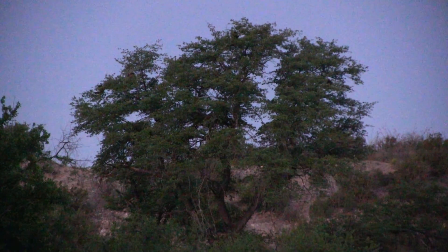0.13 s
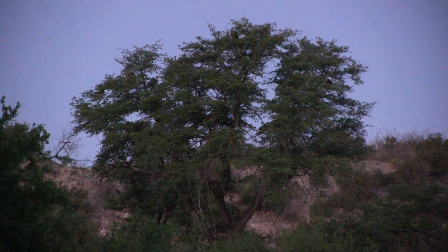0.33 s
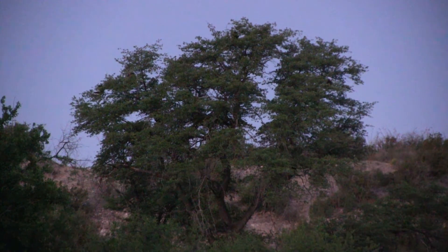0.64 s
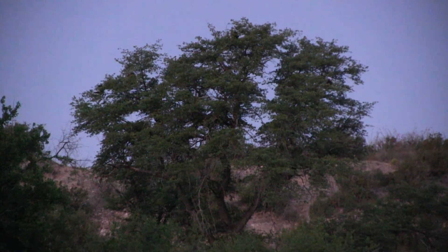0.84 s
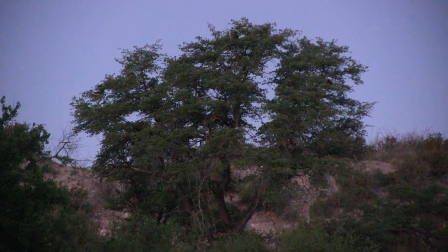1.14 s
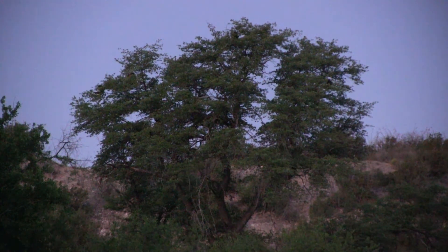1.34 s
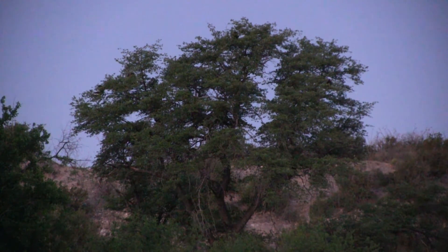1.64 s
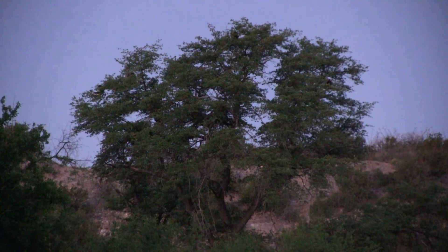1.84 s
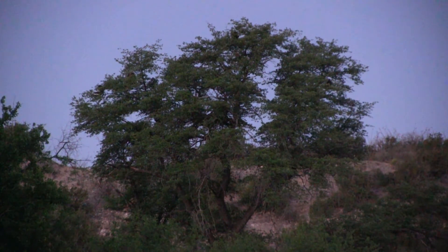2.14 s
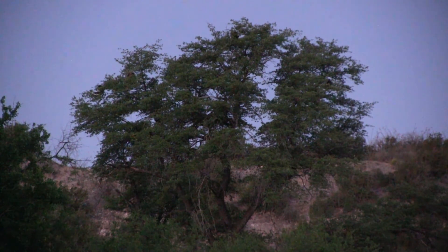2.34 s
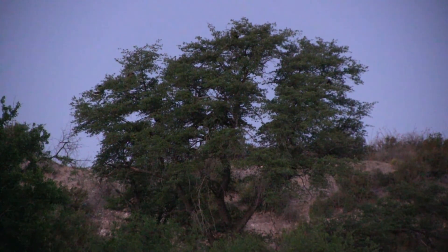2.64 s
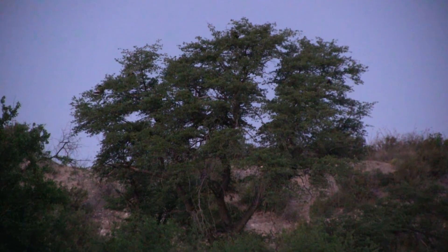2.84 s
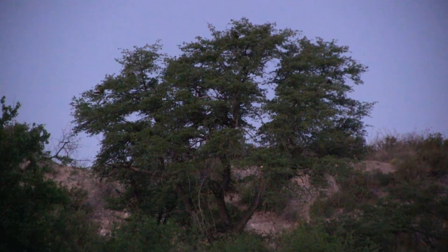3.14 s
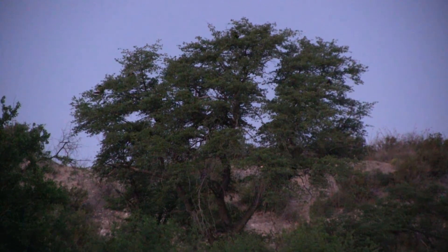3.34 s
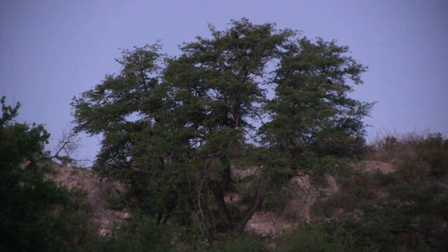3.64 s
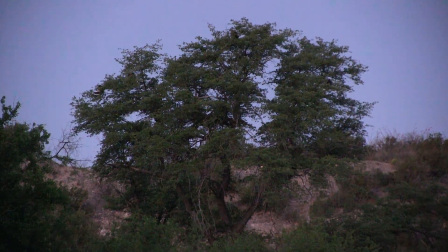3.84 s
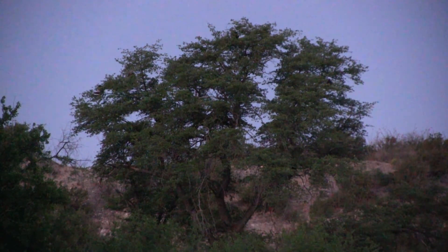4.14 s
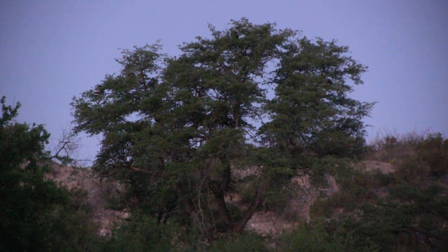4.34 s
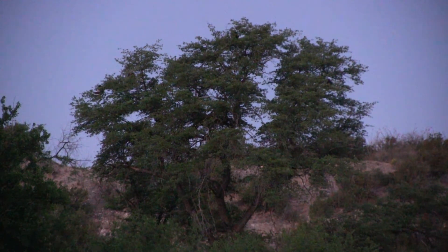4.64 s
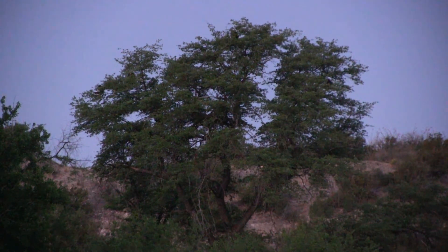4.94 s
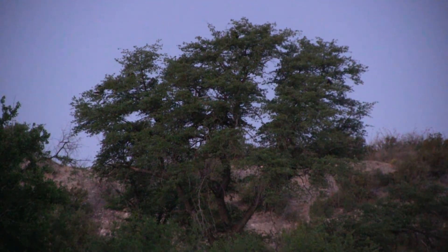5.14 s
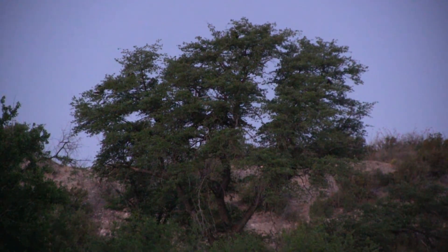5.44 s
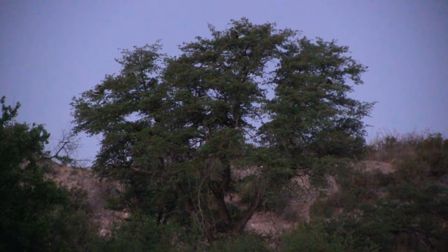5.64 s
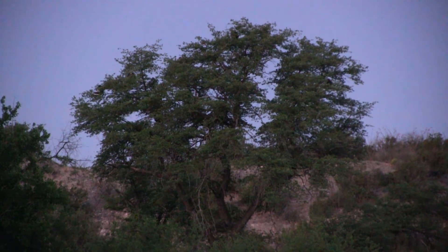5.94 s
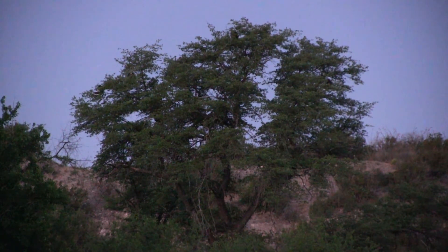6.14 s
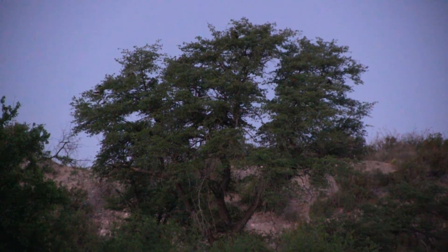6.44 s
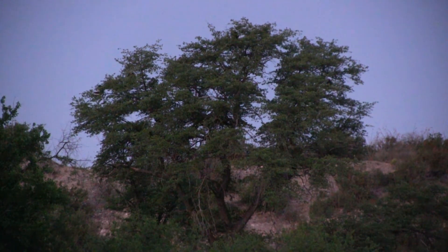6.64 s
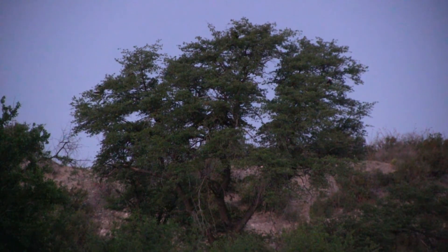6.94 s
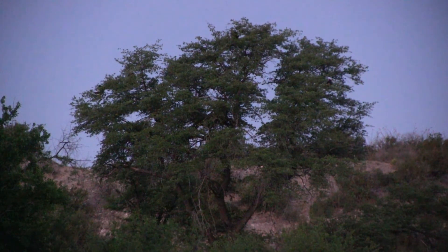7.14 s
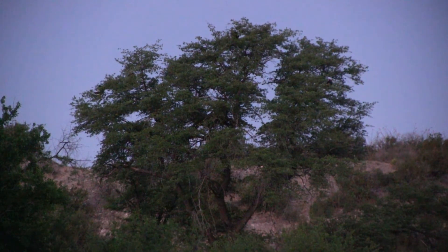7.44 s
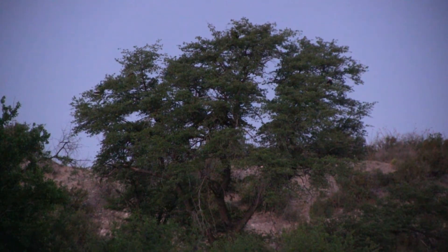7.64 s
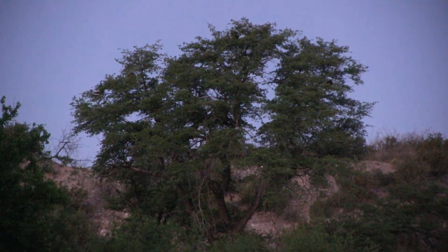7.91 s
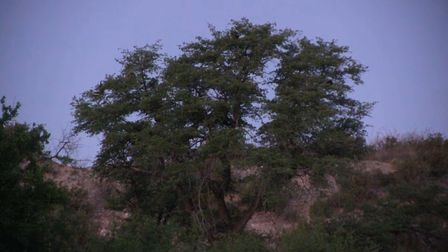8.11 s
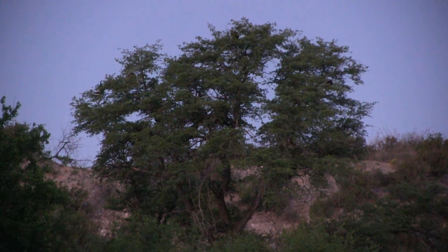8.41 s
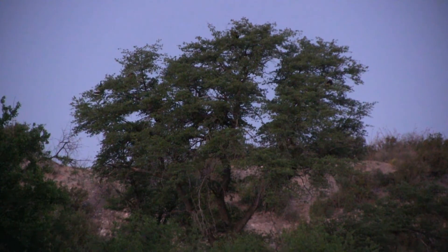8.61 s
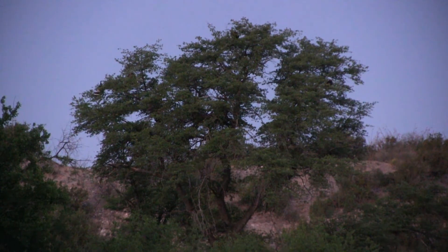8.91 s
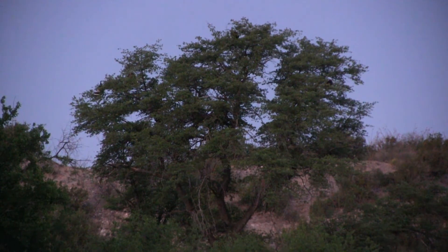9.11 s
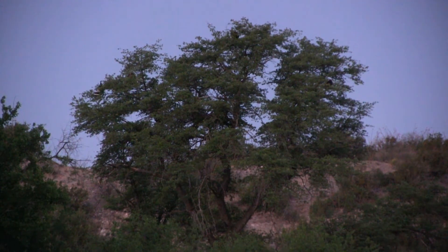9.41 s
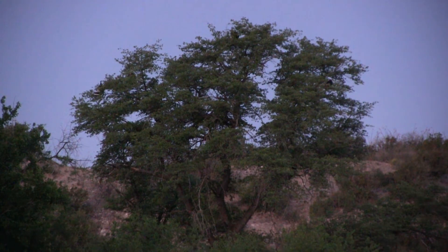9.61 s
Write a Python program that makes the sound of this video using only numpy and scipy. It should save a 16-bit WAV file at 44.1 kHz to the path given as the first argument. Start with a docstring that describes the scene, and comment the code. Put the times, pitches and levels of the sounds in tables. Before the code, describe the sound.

Still dawn air with faint rumble and microphone hiss, birds straight ahead across a brushy gully. From 0.2 s a turkey gives soft, nasal, wavering yelps, about 0.1 s each and three per second, fading by 2.8 s. Distant songbirds trill, chip in quickening runs and whistle thinly throughout. At 3.1 s a rough, low gobble tumbles in rapid raspy notes and gulps until about 4.3 s. From 4 to 6.4 s sharp, bright, dropping cutts pulse evenly near 0.3 s apart; a faint fluttering buzz rises at 4.05-4.5 s. A second, more broken gobble runs 6.6-7.8 s, with two more cutts and a small dry tick at 7.5 s. From 8 s yelps return stronger and brighter every 0.3 s, joined by whistled kees cracking upward at 8.5, 8.85 and, loudest and piercing, 9.15 s. Thin echoes trail from bank and trees; a last yelp falls at 9.7 s.

```python
"""Wild turkeys at dawn, heard from across a brushy gully, over still air and microphone hiss.
Wavering yelps run from the start while farther songbirds trill, chip and whistle as gliding near-pure tones.
Two rough, tumbling gobbles break in, from 3.1 s and 6.6 s; sharp cutts, a rising buzz and whistled kees
join from 4 s on, and one dry tick falls at 7.5 s. Turkey voices are harmonic stacks filtered by throat
resonances; sparse decaying echoes give all the birds a thin tail from bank and trees."""
import sys
import numpy as np
from scipy import signal
from scipy.fft import rfft, irfft
from scipy.io import wavfile

SR = 44100
rng = np.random.default_rng(int(sys.argv[2]) if len(sys.argv) > 2 else 0)


def file_out(sig):
    """Save sig as 16-bit WAV at sys.argv[1]."""
    # one column per channel
    cols = np.atleast_2d(sig).T
    # limit, then scale
    lim = np.clip(cols, -1, 1)
    pcm = np.round(lim * 32767).astype(np.int16)
    wavfile.write(sys.argv[1], SR, pcm)


N = 430857
EDGE_HZ = 15800  # upper band limit of the air noise and of the recorder

# a chip's sweep up and down: (time from the chip [s], factor on its pitch, relative level [dB])
CHIP_SWEEP = [(-.016, 0.72, -5), (-.006, 0.85, 8.5), (0, 1.01, 6), (.006, .95, 6.5), (.02, 0.68, -5.5)]


def amp(db):
    """Logarithmic level: decibels to amplitude gain."""
    return 10 ** (np.asarray(db) / 20)


def evened(x):
    """Normalisation by power: scales to rms 1."""
    return x / np.sqrt(np.mean(x ** 2) + 1e-20)


def read(points, hz):
    """Interpolation on a log-frequency axis: reads a spectrum."""
    f, value = np.transpose(points)
    return np.interp(np.log(hz + 1), np.log(f + 1), value)


def add(mix, s, sound):
    """Superposition: mixes a sound in at time s."""
    part = mix[max(round(s * SR), 0):][:len(sound)]
    part += sound[:len(part)]


def wander(size, rate_hz):
    """Noise through a Gaussian low-pass: smooth chance variation, near rms 1, mostly below the rate."""
    count = size + 8192
    hz = np.fft.rfftfreq(count, 1 / SR)
    spectrum = rfft(rng.standard_normal(count)) * np.exp(-.5 * (hz / rate_hz) ** 2)
    return evened(irfft(spectrum, count))[:size]


def clock(length):
    """Sampled time axis: seconds along one note."""
    return np.arange(int(length * SR)) / SR


def arch(along, peak, depth_db):
    """Parabolic envelope: a level in dB that swells to a peak part way along a note and sinks again."""
    return -depth_db * (along - peak) ** 2


def tone(hz, gain):
    """Phase is the integral of frequency: a gliding sine of the given rms."""
    return np.sqrt(2) * gain * np.sin(2 * np.pi * np.cumsum(hz) / SR)


def syllables(rows, gesture, waver, overtone_db=-60):
    """Frequency and amplitude modulation: one gesture repeated at each row's time, pitch and level."""
    out = np.zeros(N)
    at, factor, shape_db = np.transpose(gesture)
    t = np.arange(at[0], at[-1], 1 / SR)
    gain = amp(np.interp(t, at, shape_db)) * signal.windows.tukey(len(t), .15)
    for s, pitch, db in rows:
        hz = pitch * np.interp(t, at, factor) * (1 + waver * wander(len(t), rate_hz=112))
        octave = amp(overtone_db) * tone(2 * hz, gain)
        add(out, s + at[0], amp(db) * (tone(hz, gain) + octave))
    return out


def turkey(notes, throat, jitter, rasp, rasp_hz, shake_db, rise, fall, darken_db=0, second_db=0, low_tilt=1):
    """Source and filter: the syrinx makes a stack of harmonics that slide through the throat's resonances."""
    out = np.zeros(N)
    orders = np.arange(1, 11)[:, None]
    for s, hz, level_db, bright_db, rough in notes:
        size = len(hz)
        t = np.arange(size) / SR
        ends = np.clip(t / rise, 0, 1) * np.clip((t[-1] - t) / fall, 0, 1)  # rise and fall in seconds
        gain = amp(level_db) * np.sin(np.pi / 2 * ends) ** 2
        unsteady_hz = hz * (1 + jitter * rough * wander(size, rate_hz=133))
        phase = 2 * np.pi * np.cumsum(unsteady_hz) / SR
        # as the throat closes, the weight moves from the second harmonic to the fundamental
        closing_share = np.where(orders == 2, 1, 0.39 * (orders > 1))
        closing_db = darken_db * np.linspace(1, -1, size) * closing_share
        flutter_db = shake_db * np.array([wander(size, rate_hz=26.0) for _ in orders])
        tilt_db = bright_db * np.log2(orders / 2) * np.where(orders == 1, low_tilt, 1)  # about the second harmonic
        throat_db = read(throat, orders * hz) + second_db * (orders == 2)
        weights = amp(throat_db + tilt_db + closing_db + flutter_db)
        weights /= np.sqrt((weights ** 2).sum(0) / 2)  # the timbre leaves the level alone
        # an unsteady membrane smears each harmonic into a band of rasp
        smear = np.array([wander(size, rasp_hz) + 1j * wander(size, rasp_hz) for _ in orders]) / np.sqrt(2)
        share = np.clip(rasp * rough, 0, 1) * np.where(orders > 1, 1, .6)  # the fundamental stays cleaner
        modulation = np.sqrt(1 - share ** 2) + share * smear
        harmonics = weights * modulation * np.exp(1j * orders * phase)
        add(out, s, gain * harmonics.real.sum(0))
    return signal.sosfilt(signal.butter(10, 480, "highpass", fs=SR, output="sos"), out)


def air():
    """Shaped noise with partial stereo coherence: steady faint rumble and hiss of air and microphone."""
    # noise spectrum: (frequency [Hz], relative density [dB per Hz])
    spectrum = [(12, -40), (20, -1.5), (418, -10), (635, -10), (817, -8), (1280, -16.5), (1640, -6.5),
                (1940, -15.5), (2170, -6), (2790, -17), (6430, -15.5), (9240, -10), (15700, -10)]
    # likeness of left and right: (frequency [Hz], correlation [0-1])
    likeness = [(30, 0.61), (120, 0.33), (600, 0.71), (2000, 1), (4000, 0.47), (13000, 0.99)]
    level_db = -52
    hz = np.fft.rfftfreq(N, 1 / SR)
    mid, side = rfft(rng.standard_normal((2, N))) * amp(read(spectrum, hz)) * (hz < EDGE_HZ)
    same = np.clip(read(likeness, hz), 0, 1)
    mid, side = mid * np.sqrt(1 + same), side * np.sqrt(1 - same)
    return amp(level_db) * evened(irfft(np.array([mid + side, mid - side]), N))


def yelp(s, length, pitch_hz, swing, crest, db, swell_db, bright_db, rough=0.16):
    """Resonance detuning: pitch makes one wave and a final flip, weakening below the throat's tuning."""
    flip, flip_s = 0.1258, 0.01204
    tuned_hz, weaken_db_per_hz = 815, 0.08
    t = clock(length)
    along = t / length
    wave = swing * np.cos(2 * np.pi * (along - crest))
    hz = pitch_hz * (1 + wave + flip * np.exp((t - length) / flip_s))
    weakening_db = weaken_db_per_hz * np.maximum(tuned_hz - hz, 0)
    return s, hz, db + swell_db * (along - .5) - weakening_db, bright_db, rough


def squawk(s, length, pitch_hz, db, bright_db, rough=0.24):
    """Constant pitch under a parabolic envelope: a brief swell on one low note."""
    along = clock(length) / length
    return s, np.full(len(along), pitch_hz), db + arch(along, peak=0.45, depth_db=66), bright_db, rough


def cutt(s, length, pitch_hz, drop, db, bright_db, rough=0.22):
    """Exponential relaxation: starts high and loud, settles and fades, with a small upward flip at the end."""
    drop_s, flip, flip_s = 0.01793, .1, 0.0058
    fade_db, fade_s = 12, 0.031
    t = clock(length)
    hz = pitch_hz * (1 + drop * np.exp(-t / drop_s) + flip * np.exp((t - length) / flip_s))
    return s, hz, db - fade_db * (1 - np.exp(-t / fade_s)), bright_db, rough


def yelps():
    """Shared resonator: yelps, cutts and squawks use one throat, with the second harmonic lifted."""
    # wavering yelps: (time [s], length [s], pitch [Hz], swing [share of pitch], place of crest [0-1],
    # level [dB], swell over the note [dB], brightness [dB per octave])
    yelp_rows = [(0.195, 0.09, 780, 0.12, 0.17, -42, 3, -8),
                 (0.306, .097, 838, 0.035, 0.33, -44.5, 15, -16),
                 (0.512, 0.097, 782, .095, 0.2, -38, 2.5, -10),
                 (0.827, 0.099, 776, .09, .22, -38.5, 1, -11), (1.142, .1, 785, 0.081, 0.2, -38.5, 1, -16),
                 (1.452, .098, 787, 0.096, 0.22, -36.5, 3, -10),
                 (1.774, 0.099, 775, .09, 0.18, -37.5, 0, -14), (2.083, .1, 773, .1, 0.18, -39, 0, -10),
                 (2.41, 0.098, 768, 0.088, 0.15, -41, -2.5, -12),
                 (2.78, 0.035, 787, 0.013, 0.33, -44, -3, -18), (4.251, .03, 803, .01, 0, -33.5, -9, 0),
                 (5.564, .077, 791, 0.017, 0.01, -34.5, -4, -10),
                 (5.968, 0.0327, 788, 0.012, 0.3, -43, -6, 3),
                 (6.266, 0.051, 799.5, 0.012, 0, -37.5, -10, 0),
                 (8.053, 0.087, 848, .025, 0.7, -33, 10, -5), (8.355, 0.098, 849, .025, 0.07, -27.5, -2, 4),
                 (8.683, .105, 863, 0.017, 0.01, -29, -2, 6.5), (8.993, 0.1, 822.5, 0.069, .1, -27, 3, 14),
                 (9.319, 0.11, 837, 0.059, 0.14, -28.5, 0, 11.5),
                 (9.662, 0.1, 862, 0.055, 0.14, -28.5, 0, 11.5)]
    # short notes that start high and drop: (time [s], length [s], settled pitch [Hz],
    # drop [share of pitch], first level [dB], brightness [dB per octave])
    cutt_rows = [(3.977, .066, 836, 0.166, -28.5, 12), (4.269, .063, 838, .17, -25.5, 7),
                 (4.563, 0.074, 840, 0.191, -23.5, 9.5), (4.879, 0.077, 821, 0.27, -22.5, 8),
                 (5.172, 0.078, 830, 0.257, -23, 3), (5.233, 0.033, 815, 0.11, -25.5, -3),
                 (5.453, 0.079, 829.5, 0.28, -22.5, 3), (5.739, 0.079, 828, 0.28, -22.5, 7),
                 (6.023, .068, 809, .3, -23.5, 4), (6.348, 0.045, 801, 0.29, -28.5, 5),
                 (7.109, 0.078, 819, .15, -30, 17), (7.404, .064, 828, 0.162, -29, 14)]
    # low squawks: (time [s], length [s], pitch [Hz], peak level [dB], brightness [dB per octave])
    squawk_rows = [(1.18, 0.054, 629, -32.5, 1), (8.079, .053, 744, -34, 6)]
    # throat resonances: (frequency [Hz], relative gain [dB])
    throat = [(600, -32), (850, -21), (1250, -21), (1550, 5.5), (1750, 1.5), (2100, 0), (2550, -9.5),
              (2850, -28.5), (3200, -43.5), (7000, -82)]
    notes = [yelp(*row) for row in yelp_rows]
    notes += [cutt(*row) for row in cutt_rows]
    notes += [squawk(*row) for row in squawk_rows]
    return turkey(notes, throat, jitter=0.078, rasp=0.41, rasp_hz=164, shake_db=3.0,
                  rise=0.018, fall=0.0035, second_db=1.15, low_tilt=0.27)


def chorus(db=-77, low_hz=2700, high_hz=5800, count=260):
    """Random superposition: far songbirds chip at random moments and pitches, up to 10 dB above db."""
    when, high, size = rng.random((count, 3)).T
    rows = np.transpose([when * N / SR, low_hz + high * (high_hz - low_hz), db + 10 * size ** 2])
    return syllables(rows, CHIP_SWEEP, waver=0.0089)


def trill(runs, syllable):
    """Periodic repetition: one syllable at a steady pace, its level drifting along the run."""
    rows = [(s, 1, np.interp(s, [start, end], [first_db, last_db]))
            for start, end, period, first_db, last_db in runs for s in np.arange(start, end, period)]
    return syllables(rows, syllable, waver=0.0088)


def trills():
    """Frequency glides in periodic runs: slurs, falls and seesaws each repeat their own syllable."""
    # runs of each syllable: (start [s], end [s], period [s], first level [dB], last level [dB])
    slur_runs = [(0.295, .72, .123, -65, -61.5), (7.19, 7.38, .126, -65, -62),
                 (7.514, 8.22, .129, -61.5, -55)]
    fall_runs = [(0.778, 1.16, .0853, -60.5, -60.5), (8.217, 8.71, .0905, -64, -60)]
    seesaw_runs = [(4.73, 5.33, .11, -49, -50)]
    # syllables: (time from the syllable's start [s], pitch [Hz], relative level [dB])
    slur = [(0, 6500, -4), (.015, 6170, -1.5), (.04, 4240, 4.5), (.055, 3900, 0), (.075, 4310, -2)]
    fall = [(0, 5600, -14), (0.019, 5080, 6), (.04, 4150, -0.5)]
    seesaw = [(0, 6000, -6), (0.021, 6150, -17), (.04, 5750, 2), (.058, 4500, -15), (0.071, 4400, -3.5),
              (0.086, 4610, 5.5), (0.099, 4920, 2)]
    return trill(slur_runs, slur) + trill(fall_runs, fall) + trill(seesaw_runs, seesaw)


def song(start, last, stretch, db, count=10):
    """Geometric timing, as of a bouncing ball: chips close up, rise and swell toward the last one."""
    last_gap_s, gap_growth, longest_gap_s = .041, 1.35, .14  # before the stretch
    low_hz, rise_hz, rise_s, swell_db_per_s = 3766, 1797, .24, 7.5
    gaps = stretch * np.minimum(last_gap_s * gap_growth ** np.arange(count), longest_gap_s)
    return [(last - early, low_hz + rise_hz * np.exp(-early / rise_s), db - swell_db_per_s * early)
            for early in np.cumsum([0, *gaps]) if last - early >= start]


def chips():
    """Brief frequency sweeps: quickening songs and lone chips."""
    # songs: (earliest start [s], last chip [s], stretch of the rhythm [factor], last level [dB])
    songs = [(0.65, 1.669, 1.15, -56), (2.78, 3.397, 1.02, -58), (5.12, 5.783, 1.07, -54.5)]
    # lone chips: (time [s], pitch [Hz], level [dB])
    lone = [(2.347, 3920, -59.5), (4.677, 3800, -60)]
    rows = [chip for row in songs for chip in song(*row)]
    return syllables([*lone, *rows], CHIP_SWEEP, waver=0.011)


def whistles():
    """Quadratic frequency glide: each whistle's pitch follows a parabola through three points."""
    # whistles: (time [s], length [s], start pitch [Hz], middle pitch [Hz], end pitch [Hz], level [dB])
    rows = [(1.7, .09, 3610, 4020, 3640, -52), (1.84, 0.086, 4500, 4930, 4800, -63),
            (2.849, 0.11, 2135, 1725, 2140, -55), (3.963, 0.078, 5740, 5530, 5160, -52),
            (4.578, 0.1, 5730, 5750, 5200, -50.5), (4.67, 0.0374, 4330, 4520, 5000, -46.5),
            (5.799, 0.106, 3660, 4020, 3680, -50.5), (8.56, .11, 3450, 2810, 2100, -65),
            (9.06, 0.076, 3900, 5080, 4570, -63.5)]
    out = np.zeros(N)
    for s, length, *pitches, db in rows:
        along = np.linspace(0, 1, int(length * SR))
        hz = np.polyval(np.polyfit([0, .5, 1], pitches, 2), along)
        wavering_hz = hz * (1 + 0.011 * wander(len(hz), rate_hz=230))
        add(out, s, tone(wavering_hz, amp(db) * signal.windows.tukey(len(hz), .5)))
    return out


def songbirds():
    """Linear superposition of all the small birds' sounds."""
    out = chorus() + trills() + chips() + whistles() + rattles()
    add(out, *buzz())
    return out


def gobble_note(s, length, top_hz, climb, bend, db, bright_db, rough):
    """Power-law glide: the pitch climbs to its top, then slumps; the level peaks just past the middle."""
    slump_s, slump = 0.0298, 0.22
    t = clock(length)
    top_s = length - slump_s
    risen = np.minimum(t / top_s, 1) ** bend
    slumped = np.maximum((t - top_s) / slump_s, 0) ** 2
    hz = top_hz * (1 - climb * (1 - risen) - slump * slumped)
    return s, hz, db + arch(t / length, peak=0.52, depth_db=29), bright_db, rough


def gobbles():
    """Modulated harmonics: low raspy notes, broken up by quick falling gulps and low stubs of voice."""
    # low notes: (time [s], length [s], top pitch [Hz], climb [share of pitch], bend [1 = straight],
    # peak level [dB], brightness [dB per octave], roughness [0-1])
    rows = [(3.093, 0.066, 580, 0.0085, 1.1, -33, -1.5, 1), (3.16, 0.089, 672, 0.2, 0.72, -28.5, -1, 0.45),
            (3.272, 0.079, 575, .07, 1.7, -32, 0.5, 0.79), (3.335, 0.11, 664, 0.25, 0.61, -28, -3.5, 0.3),
            (3.433, 0.063, 670, 0.091, 1.14, -29.5, -1.5, 0.4), (3.512, .1, 701, 0.18, 1.17, -28, -1, .45),
            (3.6, 0.12, 668.6, 0.19, 1.1, -28, 0, 0.45), (3.72, 0.093, 644, 0.17, 1.84, -30, -3.5, 0.45),
            (3.85, .108, 589, .15, 0.54, -28.5, -1.5, 0.24), (3.958, 0.059, 613, 0.085, .7, -28, -4, .33),
            (4.147, .068, 564.3, .05, 1.3, -37.5, -8, 0.33),
            (6.583, 0.049, 557, 0.098, 1.1, -30.5, 3.5, 0.24), (6.654, .132, 681, .21, 0.69, -28, -1, 0.17),
            (6.914, .138, 664, .18, 2.4, -26.5, -1, 0.049),
            (7.242, .073, 577, 0.081, 0.94, -31.5, -3.5, 0.28),
            (7.572, 0.089, 625, 0.029, 1.2, -38, -2, 0.24),
            (7.724, .055, 571, 0.026, 0.96, -38.5, 0.5, 0.37),
            (7.762, .064, 612.7, 0.029, 0.91, -33.5, 1, 0.45)]
    # throat resonances: (frequency [Hz], relative gain [dB])
    throat = [(400, -22), (530, -5), (650, -1), (830, 22), (1100, -0.5), (1250, -4.5), (1450, -2.5),
              (1650, 0.5), (1900, -5), (2250, -16.5), (2800, -18.5), (7000, -43)]
    # quick falling gulps: (time [s], pitch [Hz], level [dB])
    gulp_rows = [(3.425, 1094, -32.5), (3.488, 1007, -38), (3.53, 1004, -38), (3.55, 1030, -35),
                 (3.588, 1000, -31), (3.755, 944, -34), (3.811, 950, -29.5), (3.827, 1046, -33),
                 (3.9, 944, -32), (4.001, 938, -34.5), (4.053, 922, -34), (4.263, 859, -41.5),
                 (4.315, 940, -40), (6.828, 1025, -35.5), (6.883, 1037, -36), (6.896, 1146, -34),
                 (7.095, 933, -36), (7.148, 967, -34), (7.356, 890, -36.5), (7.411, 951, -33.5),
                 (7.546, 1043, -41), (7.69, 940, -42)]
    # low stubs of voice, most of them sounding with or right after a gulp: (time [s], pitch [Hz], level [dB])
    stub_rows = [(3.645, 610, -29.5), (3.814, 582, -36.5), (4.264, 543, -45), (6.828, 583, -45),
                 (6.885, 574, -41), (7.094, 557, -46), (7.357, 550, -39.5), (7.411, 556, -46.5),
                 (7.505, 560, -41.5)]
    # gestures of the voice: (time from the event [s], factor on its pitch, relative level [dB])
    gulp = [(-.015, 1.1, -32), (-.005, 1.05, -0.5), (0, 0.998, 6.5), (.005, .95, -1.5),
            (0.014, 0.774, -12.5)]
    stub = [(0, 0.997, -12), (.013, 0.994, 6), (0.032, .95, -32)]
    notes = turkey([gobble_note(*row) for row in rows], throat, jitter=0.04, rasp=1.0, rasp_hz=155,
                   shake_db=4, rise=0.013, fall=0.0086, darken_db=10.0, second_db=1.0)
    gulps = syllables(gulp_rows, gulp, waver=0.018, overtone_db=-18.5)
    stubs = syllables(stub_rows, stub, waver=0.023, overtone_db=-13)
    return notes + gulps + stubs


def buzz(flutter_hz=115, depth_hz=170):
    """Frequency modulation: a long rising whistle with a fast flutter in pitch."""
    # path of the buzz: (time [s], pitch [Hz], level [dB])
    path = [(4.05, 2970, -57), (4.121, 3410, -55.5), (4.201, 4045, -55), (4.328, 4384, -54),
            (4.479, 4406, -53.5), (4.512, 4720, -53)]
    s, pitch, db = np.transpose(path)
    t = np.arange(s[0], s[-1], 1 / SR)
    flutter = depth_hz * np.sin(2 * np.pi * flutter_hz * t)
    hz = np.interp(t, s, pitch) + flutter + 45 * wander(len(t), rate_hz=310)
    gain = amp(np.interp(t, s, db)) * signal.windows.tukey(len(t), .05)
    return s[0], tone(hz, gain)


def kee(s, length, pitch_hz, climb, db, bright_db, rough):
    """Linear glide under a parabolic envelope: the pitch creeps upward as the note swells and sinks."""
    along = clock(length) / length
    return s, pitch_hz * (1 + climb * (along - .5)), db + arch(along, peak=0.63, depth_db=46), bright_db, rough


def kees():
    """Harmonics through a high throat resonance: whistled notes, the strong ones ending in an upward crack."""
    # kees: (time [s], length [s], middle pitch [Hz], climb [share of pitch], peak level [dB],
    # brightness [dB per octave], roughness [0-1])
    rows = [(5.714, 0.075, 1020, 0.068, -37.5, -23, 0.2), (8.209, 0.033, 953, .05, -43.5, -20, 0.33),
            (8.44, 0.071, 991, 0.051, -34.5, -15, 0.37), (8.801, .05, 1085, 0.044, -23, 1, .27),
            (8.891, 0.0336, 1058, 0.297, -41, -16, 0.3), (9.142, 0.047, 1128, 0.058, -13.5, 9.5, 0.18),
            (9.222, 0.044, 1027, 0.2, -41.5, -21, 0.34)]
    # throat resonances: (frequency [Hz], relative gain [dB])
    throat = [(900, 2), (2300, 15.5), (2800, -24), (3300, -36), (7000, -73)]
    # upward cracks of the voice: (time [s], pitch [Hz], level [dB])
    crack_rows = [(8.516, 1700, -29), (8.857, 1840, -15.5), (9.195, 1902, -11.5)]
    # gesture of a crack: (time from the event [s], factor on its pitch, relative level [dB])
    crack = [(-.007, 0.658, -34), (-.003, 0.842, -15), (0, 0.97, 1.5), (.003, 1.17, -13),
             (.008, 1.52, -16.5)]
    held = turkey([kee(*row) for row in rows], throat, jitter=0.067, rasp=0.98, rasp_hz=300,
                  shake_db=1.5, rise=0.0047, fall=0.0037)
    cracks = syllables(crack_rows, crack, waver=0.0054)
    return held + signal.sosfiltfilt(signal.butter(4, 2900, fs=SR, output="sos"), cracks)


def rattles():
    """Rapid periodic repetition: chips so close that they overlap."""
    # rattles: (start [s], end [s], rate [chips per second], pitch [Hz], level [dB])
    runs = [(6.25, 6.55, 30, 4060, -66), (8.22, 8.518, 37, 3940, -66.5)]
    rows = [(s, hz, db) for start, end, rate, hz, db in runs for s in np.arange(start, end, 1 / rate)]
    return syllables(rows, CHIP_SWEEP, waver=0.011)


def tick():
    """Exponentially decaying low-passed noise: one faint dry tick."""
    out, t = np.zeros(N), clock(.02)
    lowpass = signal.butter(1, 1800, fs=SR, output="sos")
    noise = signal.sosfilt(lowpass, rng.standard_normal(len(t)))
    add(out, 7.523, amp(-39) * evened(noise) * np.exp(-t / .002))
    return out


def gully(x, wet_db, near_db, near_t60):
    """Convolution with sparse echoes: near branches scatter briefly; bank and far trees give a long tail."""
    # decay of the far tail: (frequency [Hz], time to fall 60 dB [s])
    tail = [(500, 0.75), (1100, 2.18), (2000, 1.13), (5000, 1.98)]
    taps = rng.standard_normal(SR) * (rng.random(SR) < 2500 / SR)  # about 2500 echoes a second
    age = np.arange(SR) / SR
    hz, t, z = signal.stft(taps * np.clip(age / 0.015, 0, 1), SR, nperseg=256)
    decayed = z * amp(-60 * t / read(tail, hz)[:, None])
    far = signal.istft(decayed, SR, nperseg=256)[1][:SR]
    near = taps[::-1] * amp(-60 * age / near_t60) * (age > .003)
    echo = amp(wet_db) * far / np.linalg.norm(far) + amp(near_db) * near / np.linalg.norm(near)
    return x + signal.fftconvolve(x, echo)[:N]


def scene():
    """Superposition at the listener: all the birds sit straight ahead, the songbirds farther and wetter."""
    turkeys = gully(yelps() + kees(), wet_db=-16.0, near_db=-8.5, near_t60=0.14)
    small = gully(songbirds(), wet_db=-10, near_db=-7.5, near_t60=0.054)
    toms = gully(gobbles(), wet_db=-12.0, near_db=-9.5, near_t60=0.063)
    return turkeys + toms + small + tick() + air()


def record(dry):
    """Linear-phase low-pass filtering: the recorder's band limit."""
    lowpass = signal.firwin(511, EDGE_HZ, window=("kaiser", 9), fs=SR)
    return signal.oaconvolve(dry, lowpass[None], "same")


dry = scene()
out = record(dry)
file_out(out)
```